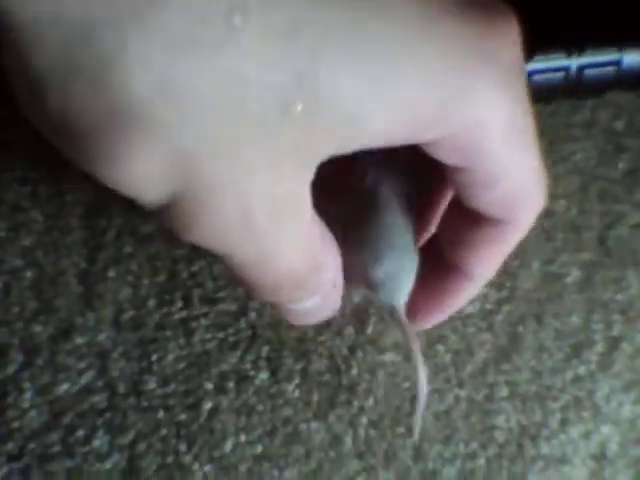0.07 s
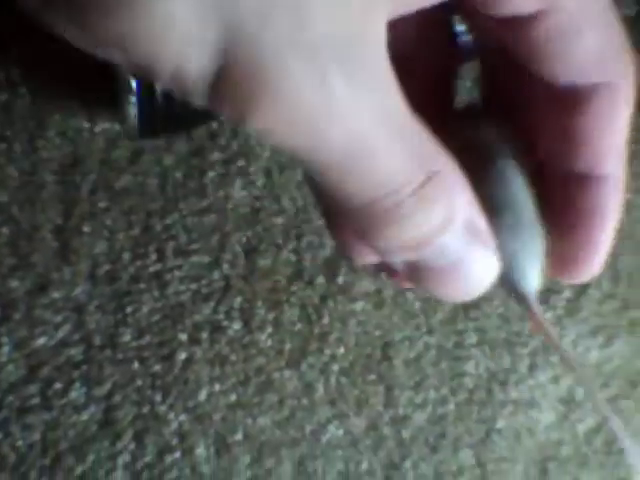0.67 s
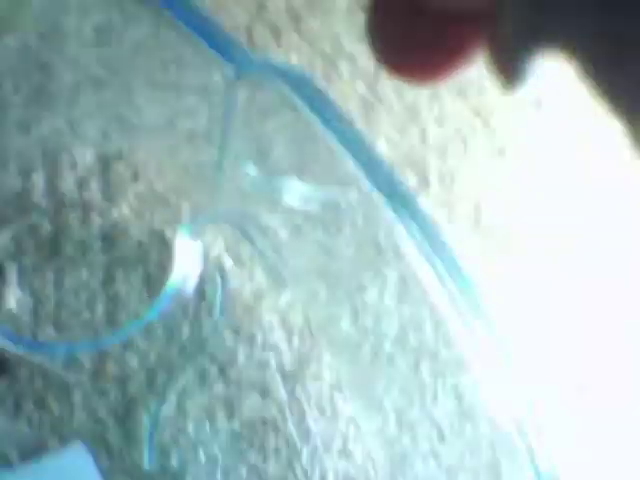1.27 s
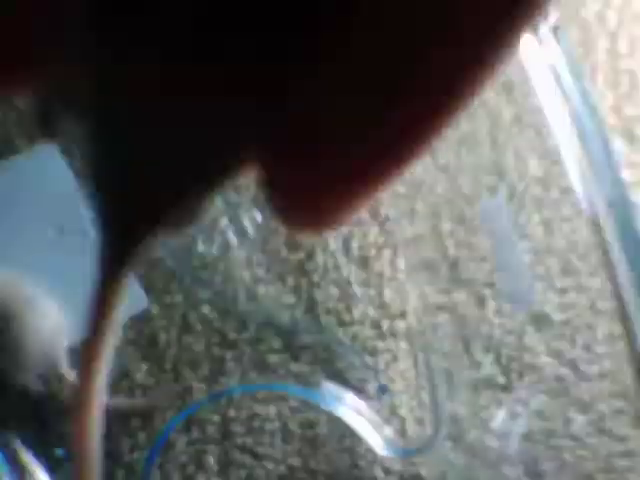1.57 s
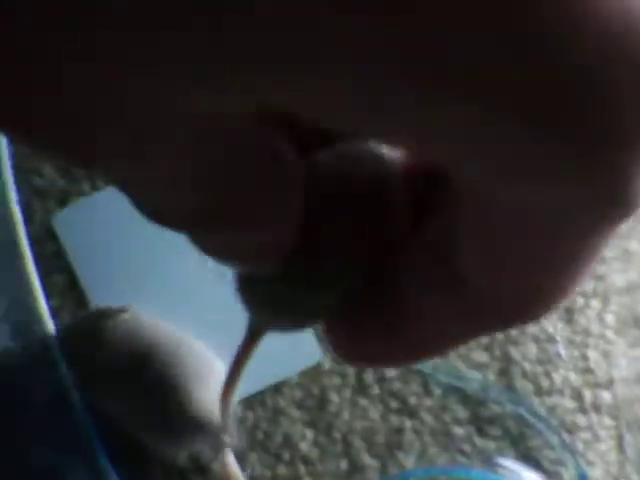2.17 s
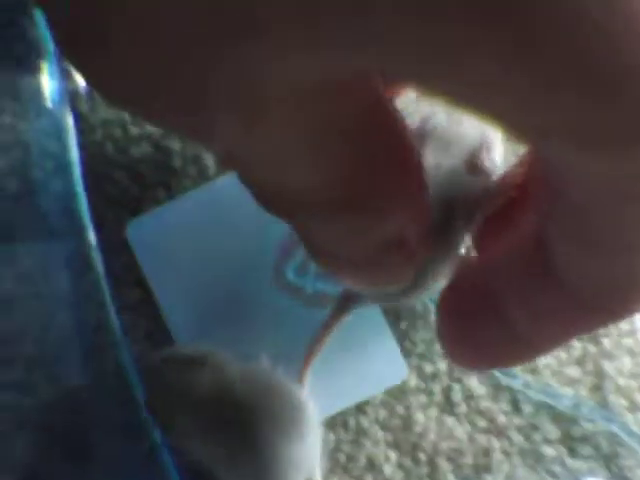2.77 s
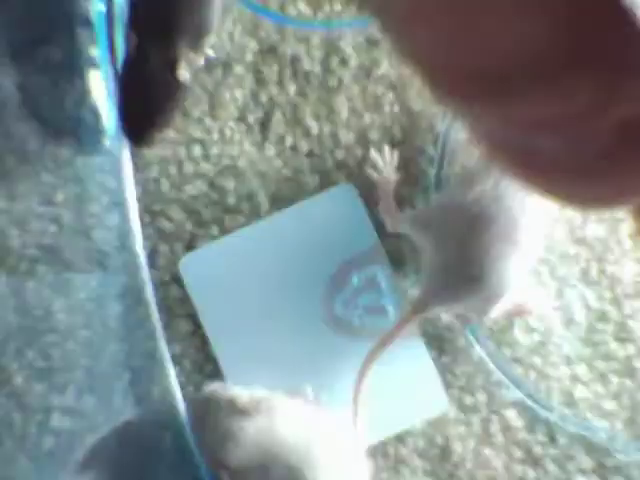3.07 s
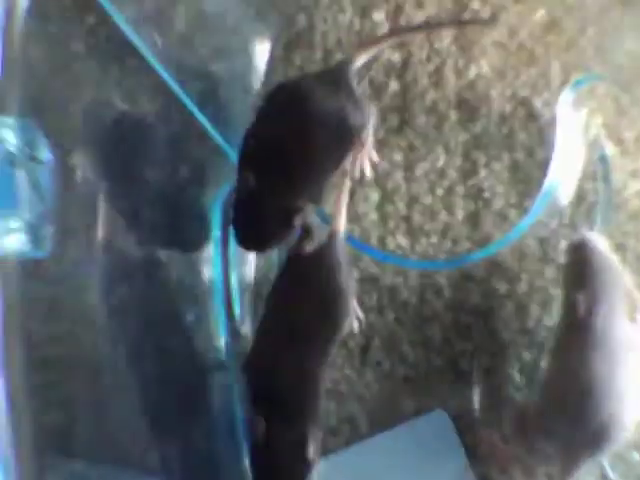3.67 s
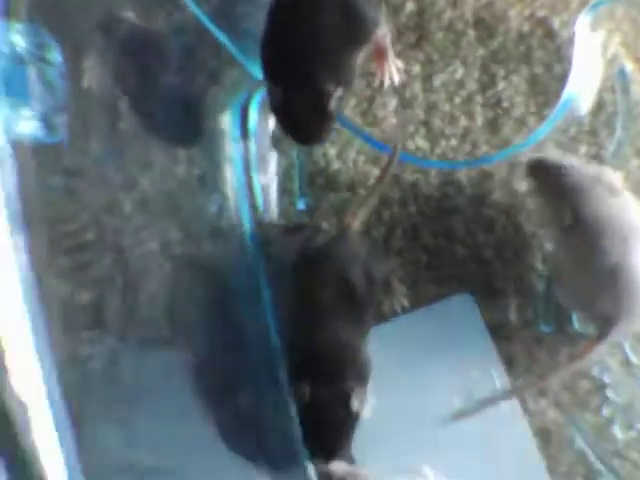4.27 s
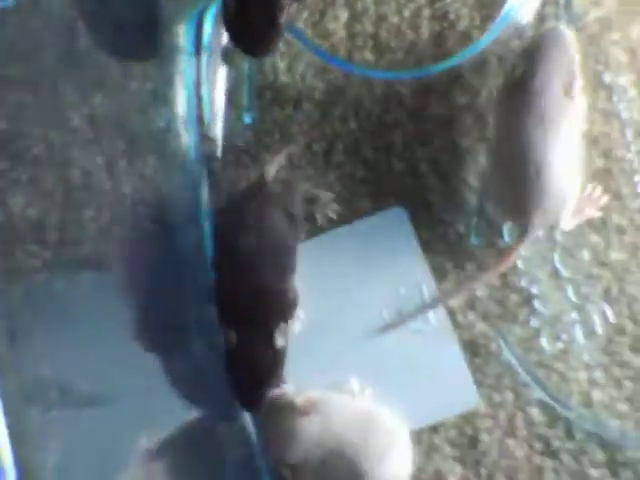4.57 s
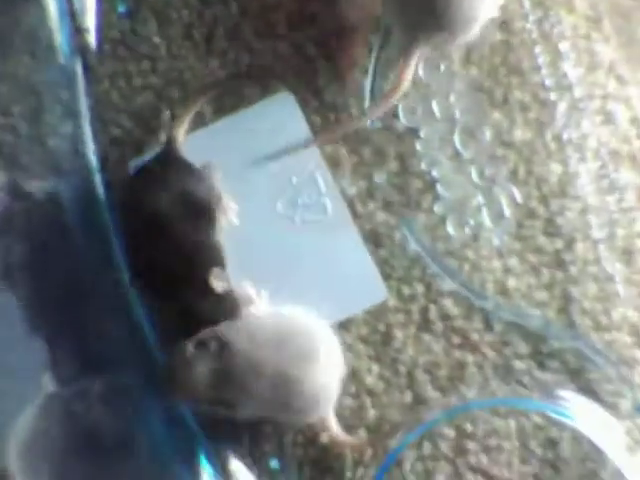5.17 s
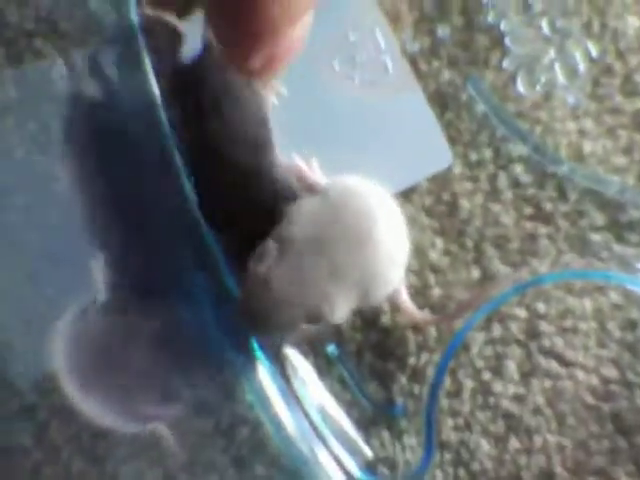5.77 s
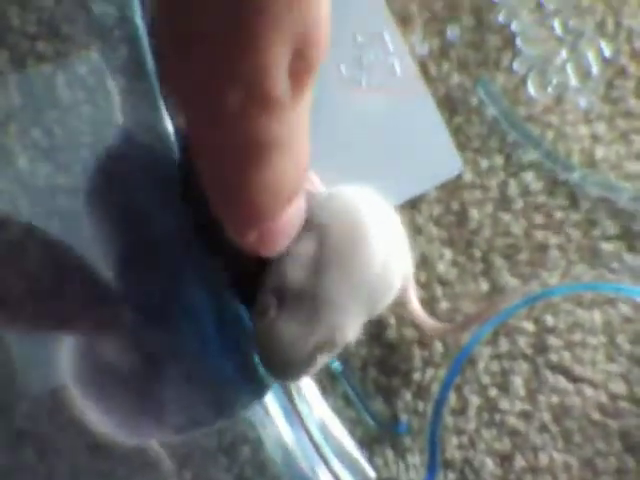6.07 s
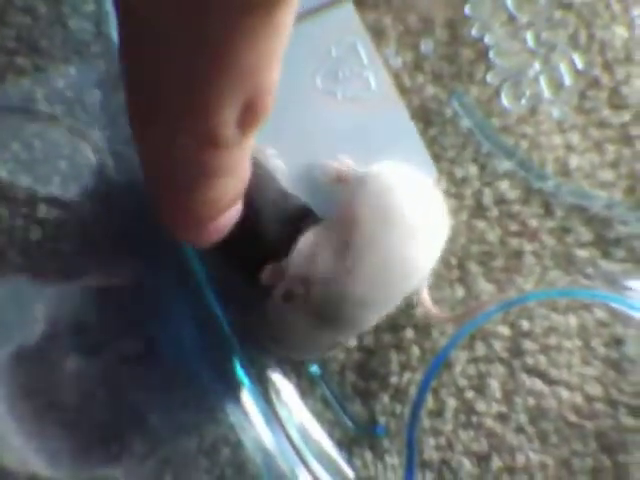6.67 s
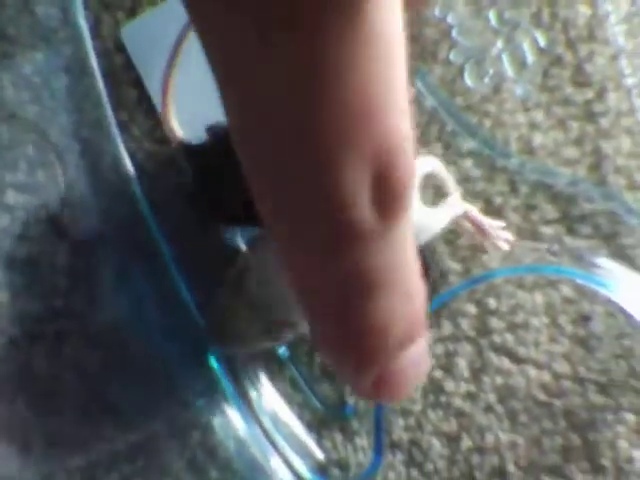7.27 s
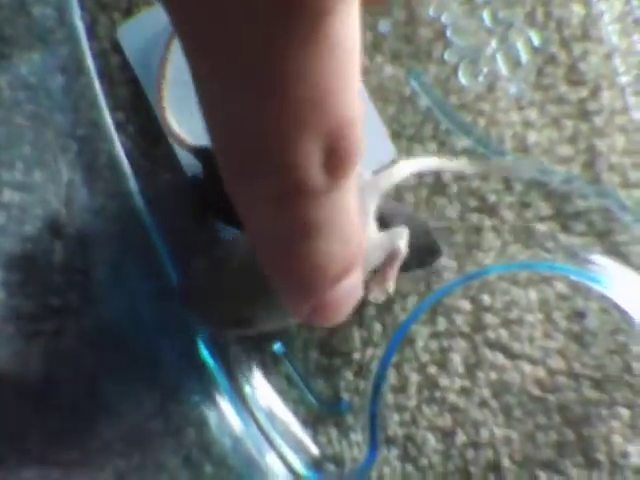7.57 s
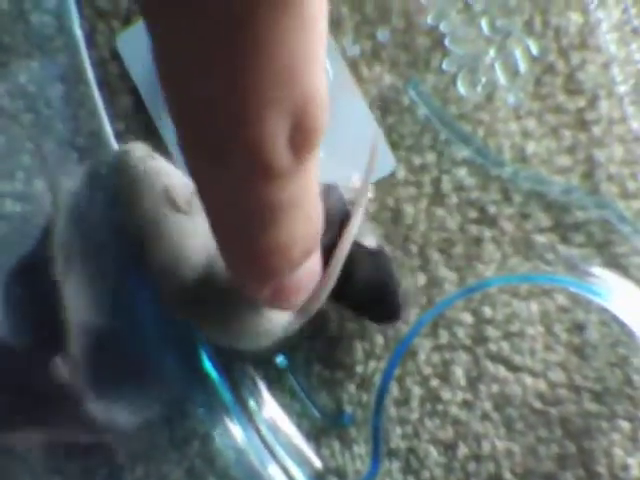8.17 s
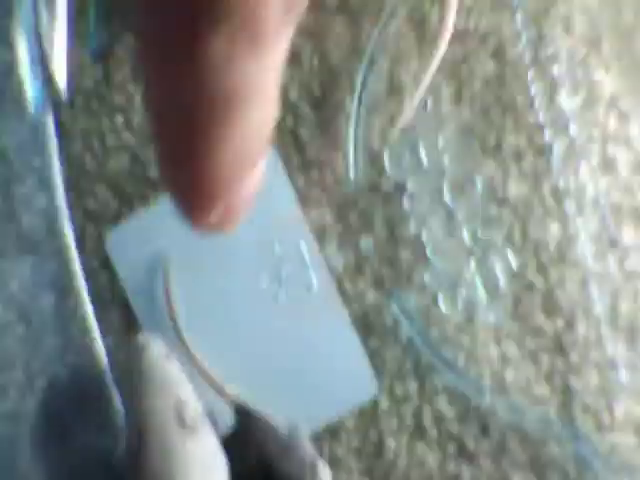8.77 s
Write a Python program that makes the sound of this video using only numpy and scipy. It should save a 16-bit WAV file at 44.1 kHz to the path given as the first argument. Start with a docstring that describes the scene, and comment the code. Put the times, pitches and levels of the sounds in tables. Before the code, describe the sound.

Steady microphone hiss and a thin electronic whine cover nearly everything. A touch bumps the close hand-held microphone at the start. A plastic tub then gives a tiny dry creak and two short dull knocks. Faint taps and finger rubs follow, with barely audible mouse paws and a softer bump. A brief squeaky finger rub on the plastic comes near the end, in a small carpeted room.

```python
"""Young mice are handled in a plastic tub on a carpet, close to a small hand-held camera.
Microphone hiss and a thin electronic whine run throughout and cover nearly everything.
A touch bumps the camera at 0.2 s. The plastic creaks at 2.1 s and takes two dull knocks at 2.6 and 2.9 s.
Faint taps and finger rubs follow; paws patter from 3.4 to 5 s, with a softer bump at 4.3 s.
The strongest rub comes last, at 8.6 s."""
import sys
import numpy as np
from scipy import signal
from scipy.fft import rfft, irfft, next_fast_len
from scipy.io import wavfile
from scipy.ndimage import map_coordinates

SR = 44100
rng = np.random.default_rng(int(sys.argv[2]) if len(sys.argv) > 2 else 0)


def waveform_to_disk(signal):
    """Save audio, clipped to [-1, 1], as 16-bit WAV at the path in sys.argv[1]."""
    frames = np.transpose(np.atleast_2d(signal))
    scaled = np.clip(frames, -1, 1) * 32767
    samples = np.round(scaled).astype(np.int16)
    wavfile.write(sys.argv[1], SR, samples)


N = 389403
T = np.arange(N) / SR

# Microphone self-noise. Each row: frequency in Hz, relative density in dB.
HISS_SPECTRUM = [(25, -2), (100, -4), (250, -2), (450, -1.65), (650, -2.5), (1050, -1.3), (1400, -2.5),
                 (2000, -0.5), (2700, -1.2), (4000, -2), (6000, -5.5), (7500, -7.5), (8900, -6.5),
                 (9500, -42.5)]
# Electronic whine. Each row: frequency in Hz, level in dB.
WHINE_TONES = [(1000, -55), (1695, -59.5), (1907, -61.5), (4625, -64.5), (6500, -54.5), (7500, -67.5),
               (8500, -67)]
# Touches on the camera body. Each row: centre in seconds, peak in dB, pitch in Hz.
CAMERA_BUMPS = [(0.158, -23.5, 480), (4.305, -34, 220)]
# Modes of the plastic. Each row: frequency in Hz, gain in dB, T60 in seconds.
TUB_MODES = [(480, -13, 0.047), (555, 1, 0.015), (787, -9, 0.049), (856, -7.5, 0.069), (1056, -4.5, 0.022),
             (1320, -13, 0.018), (1608, -13, 0.046), (1740, -22.5, 0.034), (1944, -16.5, 0.05),
             (2070, -10.5, 0.026), (2294, -14.5, .022), (2590, -12, 0.021), (3470, -11.5, 0.038),
             (5440, -17.5, .01)]
# Creaks, alone or as the plastic springs back from a blow.
# Each row: start in seconds, length in seconds, level in dB, squeak in Hz, squeak share from 0 to 1.
TUB_CREAKS = [(2.0707, .012, -20.5, 2190, 0.73), (2.1158, 0.0072, -30.5, 2140, 0.2),
              (2.553, .009, -29, 2030, 0.8), (2.865, 0.016, -33, 2060, 0.6)]
# Blows on the plastic. Each row: start in seconds, gain in dB, wall flex pitch in Hz.
TUB_KNOCKS = [(2.5532, -9.5, 580), (2.790, -30, 600), (2.8628, -9, 587), (2.963, -35.5, 750),
              (3.895, -35.5, 770), (4.805, -29, 630), (5.808, -28, 410), (8.275, -35, 530)]
# Finger drags on the plastic.
# Each row: start in seconds, length in seconds, gain in dB, squeak in Hz, squeak share from 0 to 1.
FINGER_RUBS = [(3.362, .045, -35.5, 2170, .88), (3.627, .12, -43, 2040, .65), (4.01, .025, -41, 2080, 0.7),
               (5.785, 0.028, -37.5, 2100, 0.13), (8.557, 0.16, -29.5, 2030, 0.8)]
# Room decay. Each row: frequency in Hz, T60 in seconds.
ROOM_DECAY = [(200, 0.14), (2000, 0.44), (8000, 0.095)]
# Camera treble roll-off. Each row: frequency in Hz, gain in dB.
CAMERA_ROLLOFF = [(7500, 0), (8050, -5), (8500, -15), (8700, -25), (8900, -45)]


def amp(db):
    """Decibels to gain."""
    return 10 ** (np.asarray(db) / 20)


def unit(x):
    """Scale to rms 1."""
    return x / np.sqrt(np.mean(x ** 2) + 1e-20)


def along(points, hz):
    """Interpolate (Hz, value) points on a log frequency axis."""
    knots_hz, values = np.transpose(points)
    return np.interp(np.log(hz + 1), np.log(knots_hz + 1), values)


def wobble(knots_per_s):
    """Smooth random curve."""
    knots = rng.standard_normal(int(N * knots_per_s / SR) + 4)
    return map_coordinates(knots, [T * knots_per_s])


def filtered(x, gain_at):
    """Zero-phase filter with gain gain_at(hz)."""
    size = next_fast_len(N + SR // 2)
    return irfft(rfft(x, size) * gain_at(np.fft.rfftfreq(size, 1 / SR)), size)[:N]


def hiss(level_db=-38.0):
    """Steady microphone self-noise."""
    noise = filtered(rng.standard_normal(N), lambda hz: amp(along(HISS_SPECTRUM, hz)))
    return amp(level_db) * unit(noise)


def whine(waver_db=.8, drift_rad=.4, steady_hz=3000,
          swell_hz=1907, swell_db=7, swell_at_s=.66, swell_half_width_s=.2):
    """Thin electronic tones; the lower ones waver more, and one swells briefly."""
    out = np.zeros(N)
    rise_db = swell_db * np.exp(-((T - swell_at_s) / swell_half_width_s) ** 2)
    for hz, db in WHINE_TONES:
        looseness = 1 / (1 + (hz / steady_hz) ** 2)
        phase_rad = 2 * np.pi * hz * T + drift_rad * looseness * wobble(8.3)
        level_db = db + waver_db * looseness * wobble(4.0) + rise_db * (hz == swell_hz)
        out += np.sqrt(2) * amp(level_db) * np.sin(phase_rad)
    return out


def bumps():
    """A touch on the camera gives one pressure swing, no ring."""
    out = np.zeros(N)
    for centre_s, db, hz in CAMERA_BUMPS:
        phase_rad = 2 * np.pi * hz * (T - centre_s)
        out -= amp(db) * phase_rad * np.exp((1 - phase_rad ** 2) / 2)
    return out


def tub_ring(force, baffle_hz=430):
    """Damped modes of a plastic wall too small to radiate bass."""
    t = T[:SR // 4]
    modes = sum(amp(db - 60 * t / t60_s) * np.sin(2 * np.pi * hz * t) for hz, db, t60_s in TUB_MODES)
    radiation = signal.butter(4, baffle_hz, "highpass", fs=SR, output="sos")
    return signal.oaconvolve(force, signal.sosfilt(radiation, modes))[:len(force)]


def light_contact(force, edge_hz):
    """A small, light contact hardly moves the low modes."""
    return signal.lfilter(*signal.butter(2, edge_hz, "highpass", fs=SR), force)


def squeak(force, hz, width_hz=200):
    """Slips in step keep only the force near one pitch."""
    return signal.lfilter(*signal.iirpeak(hz, hz / width_hz, fs=SR), force)


def stick_slip(t, length_s, slips_per_s=1100, scatter=.28, grit=.024, settle_db=-10.5, settle_t60_s=.1):
    """Force of uneven slips with grit between; weaker slips die away after length_s."""
    jitter, strength = rng.standard_normal((96, 2)).T
    slips_s = np.abs(np.arange(len(jitter)) + scatter * jitter) / slips_per_s
    force = grit * rng.standard_normal(len(t))
    force += np.bincount(np.round(slips_s * SR).astype(int), amp(2 * strength), len(t))[:len(t)]
    return force * np.where(t < length_s, 1, amp(settle_db - 60 * (t - length_s) / settle_t60_s))


def creaks(tighten_s=.0077, light_hz=1150):
    """Strained plastic lets go in dry snaps that tighten into a squeak."""
    out = np.zeros(N)
    t = T[:SR // 5]
    for start_s, length_s, db, hz, share in TUB_CREAKS:
        force = stick_slip(t, length_s)
        snaps = unit(tub_ring(light_contact(force, light_hz)))
        tone = unit(tub_ring(squeak(force, hz)))
        blend = share * np.minimum(t / tighten_s, 1)
        creak = unit(snaps + blend * (tone - snaps)) * np.sqrt(length_s / t[-1])
        out[round(start_s * SR):][:len(t)] += amp(db) * creak
    return out


def knocks(flex_db=-8.0, flex_t60_s=.0096, damping_power=.57,
           tock_db=-10, tock_hz=1250, tock_t60_s=.0067):
    """Each blow gives a short tock at the contact and flexes the wall."""
    force, tocks = np.zeros((2, N))
    t = T[:SR // 8]
    tock = amp(tock_db - 60 * t / tock_t60_s) * np.sin(2 * np.pi * tock_hz * t)
    for start_s, db, hz in TUB_KNOCKS:
        t60_s = flex_t60_s * amp(-damping_power * db)  # a lighter touch damps less
        flex = amp(-60 * t / t60_s) * np.sin(2 * np.pi * hz * t)
        cycles = t60_s * hz / np.log(1000)  # a longer flex spreads the same energy
        push = amp(flex_db) * flex * (2 * np.pi * hz / SR) / np.sqrt(cycles)
        force[round(start_s * SR):][:len(t)] += amp(db) * push
        tocks[round(start_s * SR):][:len(t)] += amp(db) * tock
    return tub_ring(force) + tocks


def padded_contact(force, edge_hz):
    """A soft pad rounds off the force."""
    return signal.lfilter(*signal.butter(2, edge_hz, fs=SR), force)


def stroke(start_s, length_s, attack_s, release_t60_s, fade_db_per_s=72):
    """Finger pressure: bites, eases off, lifts."""
    t = np.maximum(T - start_s, 0)
    release_db = 60 * np.maximum(t - length_s, 0) / release_t60_s
    return np.minimum(t / attack_s, 1) * amp(-fade_db_per_s * t - release_db)


def rubs(slips_per_s=6000, light_hz=1800, skin_hz=2400, body_gain=.55, flutter_db=2,
         bite_s=.011, judder_hz=64.3, judder_db=4.5):
    """Skin drags on plastic: loose slips scrape, locked slips squeak in bursts as it grabs and lets go."""
    loose, locked = (rng.random((2, N)) < slips_per_s / SR) * rng.standard_normal((2, N))
    force = padded_contact(light_contact(loose, light_hz), skin_hz) + body_gain * loose
    scrape = unit(tub_ring(force) * amp(flutter_db * wobble(130)))
    out = np.zeros(N)
    for start_s, length_s, db, hz, share in FINGER_RUBS:
        judder = amp(judder_db * np.cos(2 * np.pi * judder_hz * (T - start_s - bite_s)))
        tone = unit(tub_ring(squeak(locked, hz)) * judder)
        tone_gain = np.sqrt(share) * stroke(start_s, length_s, bite_s, release_t60_s=.14)
        scrape_gain = np.sqrt(1 - share) * stroke(start_s, length_s, attack_s=.04, release_t60_s=.9)
        out += amp(db) * (tone_gain * tone + scrape_gain * scrape)
    return out


def patter(start_s=3.4, end_s=5.0, steps_per_s=45, level_db=-55, spread_db=2, light_hz=1000, pad_hz=900):
    """Soft paws land on the tub floor at random moments."""
    steps = (rng.random(N) < steps_per_s / SR) * amp(spread_db * rng.standard_normal(N))
    force = padded_contact(light_contact(steps, light_hz), pad_hz)
    running = (T > start_s) & (T < end_s)
    return amp(level_db) * running * unit(tub_ring(force))


def room(x):
    """Short tail of a small carpeted room."""
    hz, t, spectrum = signal.stft(rng.standard_normal(SR // 2), SR, nperseg=256)
    decay = amp(-60 * t / along(ROOM_DECAY, hz)[:, None])
    tail = signal.istft(spectrum * decay, SR, nperseg=256)[1]
    return signal.fftconvolve(x, tail / np.linalg.norm(tail))[:N]


def scene(room_db=-17):
    """Tub sounds in the room, plus camera bumps, hiss and whine. Mono."""
    tub = knocks() + creaks() + rubs() + patter()
    return (tub + amp(room_db) * room(tub) + bumps() + hiss() + whine())[None]


def record(dry, limit_hz=8926, dc_offset=-.1692):
    """The camera's treble rolls off to a hard band limit; its converter rests off zero."""
    band_limited = filtered(dry[0], lambda hz: amp(along(CAMERA_ROLLOFF, hz)) * (hz < limit_hz))
    return band_limited[None] + dc_offset


dry = scene()
out = record(dry)
waveform_to_disk(out)
```